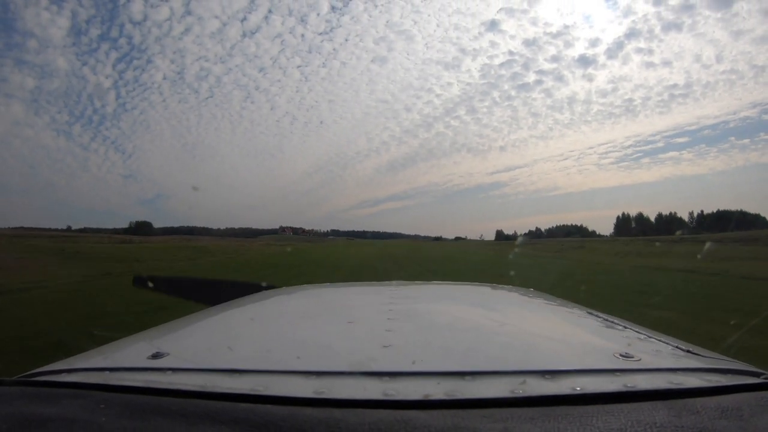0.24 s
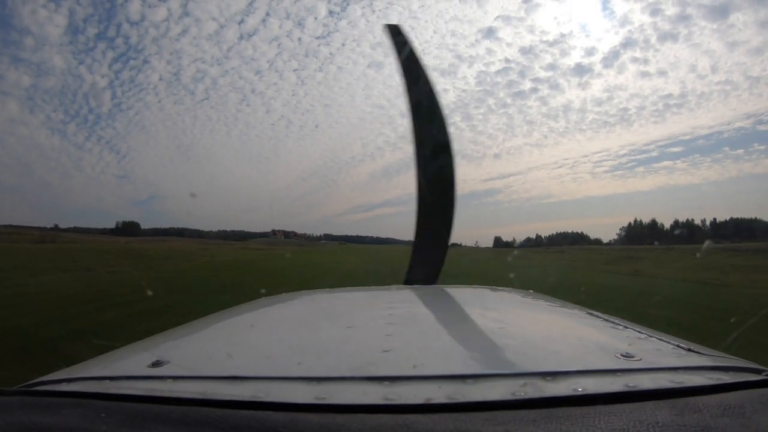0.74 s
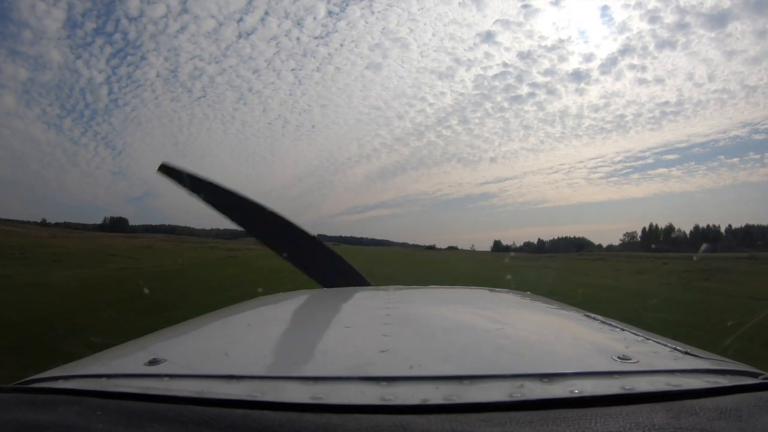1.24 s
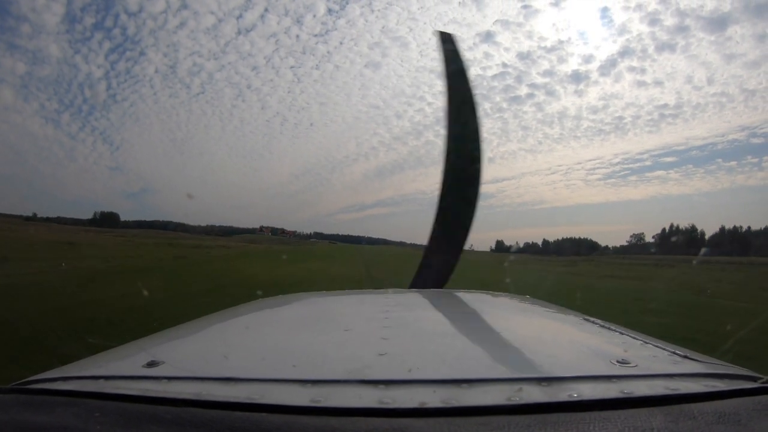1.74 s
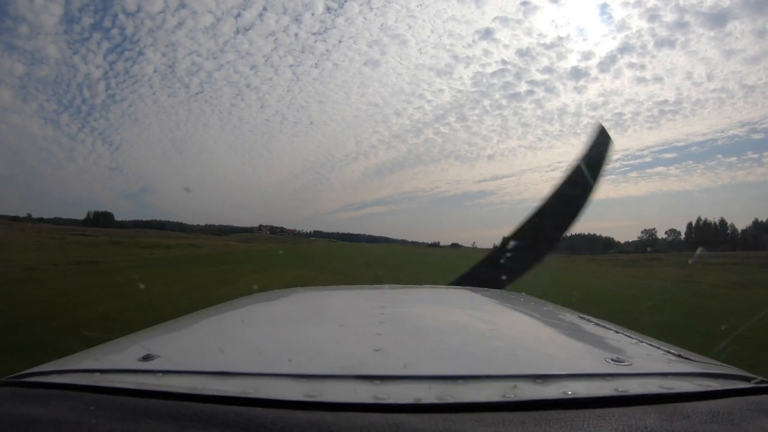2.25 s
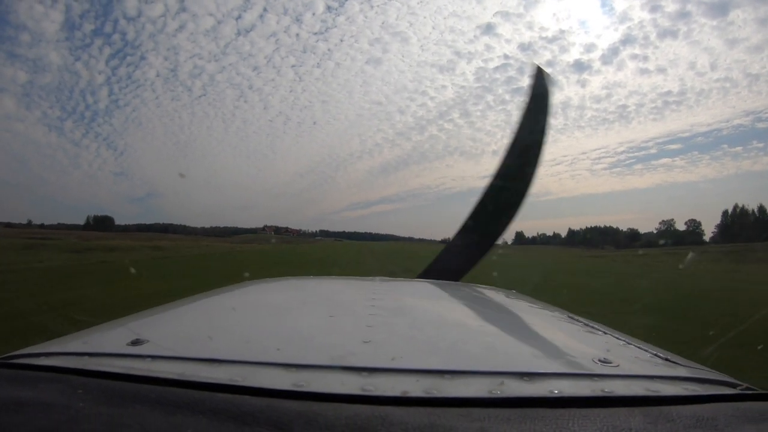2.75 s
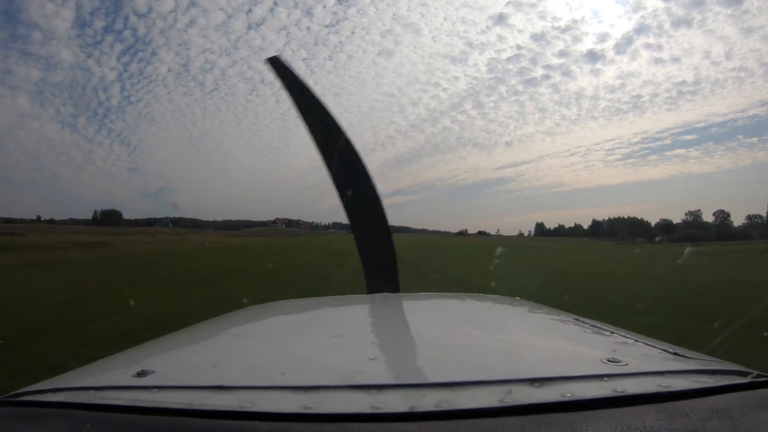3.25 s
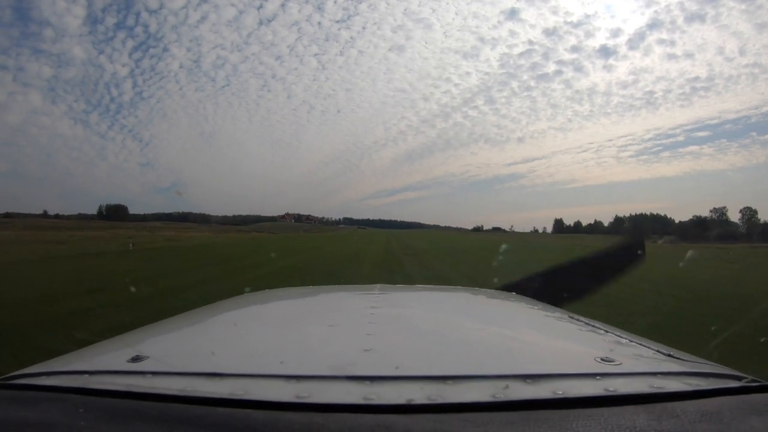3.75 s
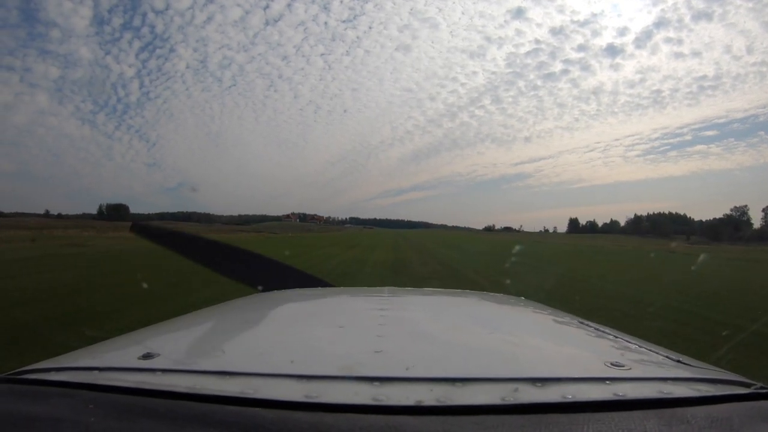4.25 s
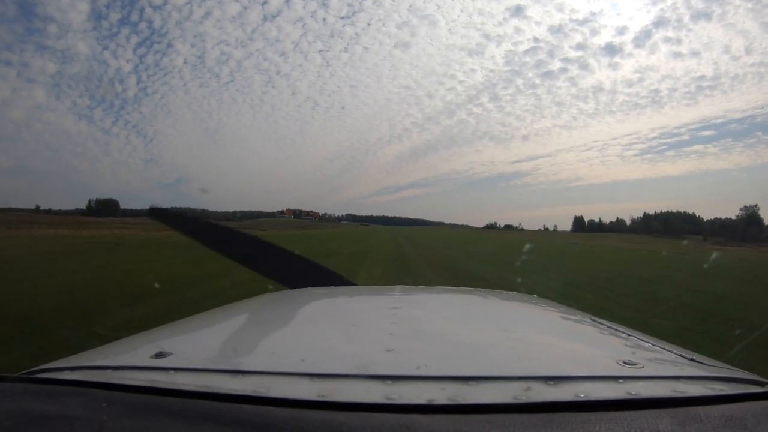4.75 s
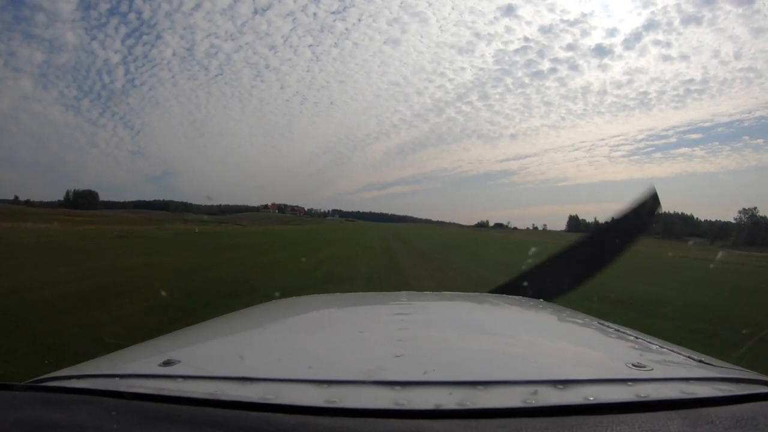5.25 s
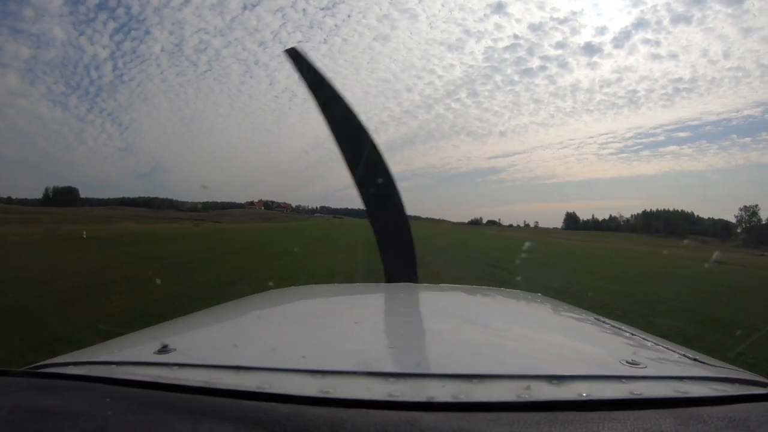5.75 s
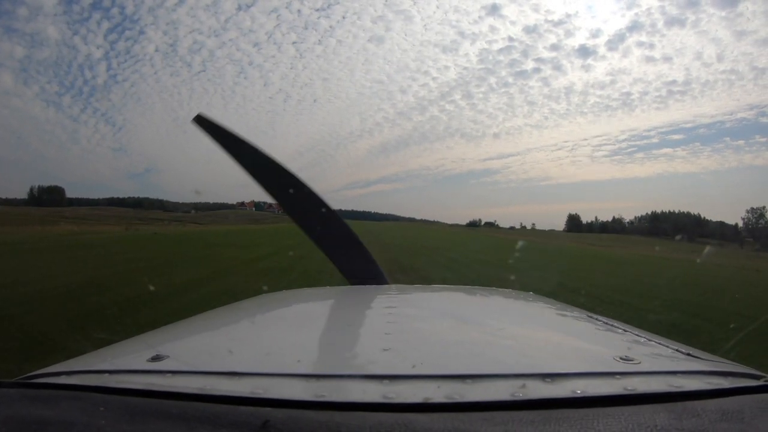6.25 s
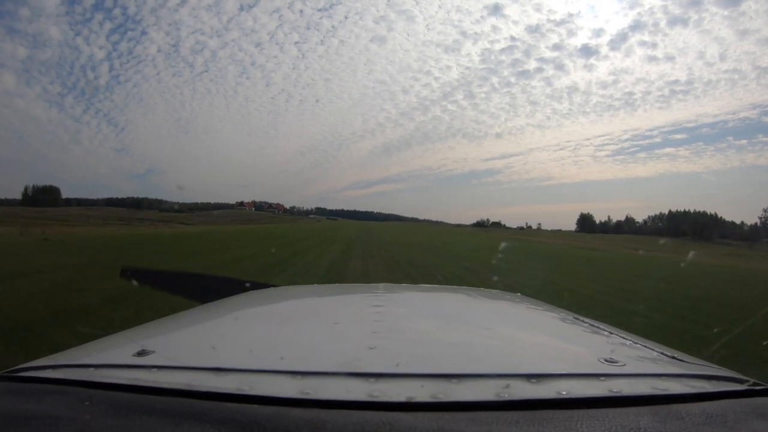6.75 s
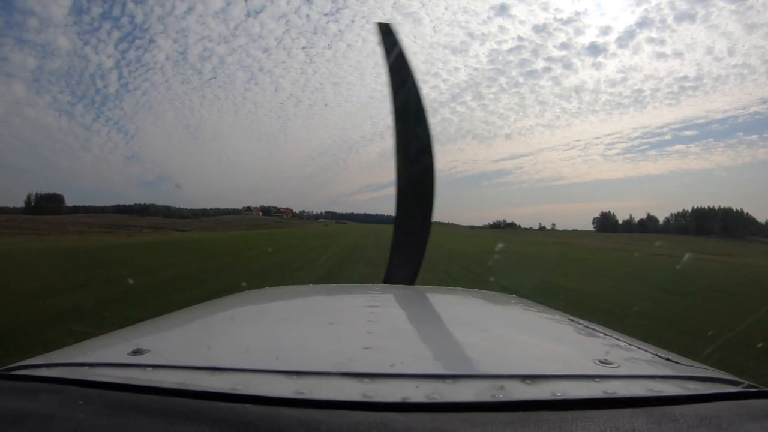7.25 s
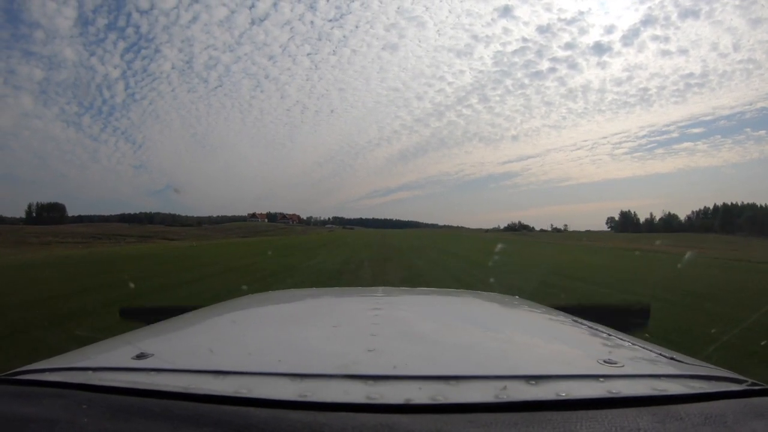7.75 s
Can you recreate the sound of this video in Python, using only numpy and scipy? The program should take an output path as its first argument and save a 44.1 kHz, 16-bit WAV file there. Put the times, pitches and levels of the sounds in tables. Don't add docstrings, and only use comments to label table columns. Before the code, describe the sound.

Inside a small aircraft cabin, a piston engine drones low at idle under rushing air with faint wavering whistles. After about three and a half seconds the wheels touch grass with thumps and a burst of grit, then a much louder, bumpy rumble continues to the end, with drumming panels, belly ticks and occasional metal chinks. Close, dry cabin microphone.

```python
import sys
import numpy as np
from scipy import signal
from scipy.fft import rfft, irfft, next_fast_len
from scipy.io import wavfile
from scipy.ndimage import uniform_filter1d

SR = 44100
rng = np.random.default_rng(int(sys.argv[2]) if len(sys.argv) > 2 else 0)


def field_ratio(decibels):
    return 10 ** (np.asarray(decibels, dtype=float) / 20)


def transcribe(signal):
    frames = np.atleast_2d(signal).T
    limited = np.clip(frames, -1, 1)
    pcm = np.round(limited * 32767).astype(np.int16)
    wavfile.write(sys.argv[1], SR, pcm)


N = 352783

# start_s, firing_hz, second_order_db
ENGINE = [(0, 34.17, -38.5), (1.4, 33.16, -35.5), (2.4, 32.61, -33.5), (3.4, 31.9, -30), (4.4, 30.44, -28),
          (5.2, 29.65, -28), (5.7, 29.21, -23.5), (6.3, 29.39, -24.5), (6.8, 28.88, -29), (7.2, 28.5, -31),
          (7.6, 28.42, -24.5), (8, 28.64, -36)]
# start_s, load_db
WHEEL_LOAD = [(3.44, -37), (3.54, -8.5), (3.59, -0.5), (3.74, 0), (3.82, 5.5), (4.0, 0), (4.14, -5),
              (4.33, 2), (4.86, -0.5), (5.2, -1.5), (5.58, -1), (5.72, 1.5), (6.27, 0), (6.55, -1),
              (6.92, 4), (7.25, 2), (7.57, 1), (8, 0)]


def evened(x):
    return x / np.sqrt(np.mean(x ** 2) + 1e-20)


def curves(rows):
    start_s, *columns = np.transpose(rows)
    return [np.interp(np.arange(N) / SR, start_s, column) for column in columns]


def colour(x, spectrum):
    size = next_fast_len(N)
    table_hz, level_db = np.transpose(spectrum)
    hz = np.fft.rfftfreq(size, 1 / SR)
    gain = field_ratio(np.interp(np.log(hz + 1), np.log(table_hz + 1), level_db))
    return evened(irfft(rfft(x, size) * gain, size)[:N])


def resonate(x, hz, width_hz):
    turn = np.exp(2j * np.pi * np.cumsum(hz * np.ones(len(x))) / SR)
    decay = np.exp(-np.pi * abs(width_hz) / SR)
    slow = signal.lfilter([1 - decay], [1, -decay], x / turn + 1e-18)
    slow = signal.lfilter([1 - decay], [1, -decay], slow)
    return evened((turn * slow).real)


def drift(hz):
    width = int(SR / hz)
    smooth = uniform_filter1d(rng.standard_normal(N), width)
    return evened(uniform_filter1d(smooth, width))


def impulses(per_s, spread_db, bed):
    size = field_ratio(spread_db * np.minimum(rng.exponential(1, N), 4)) * rng.choice([-1, 1], N)
    hits = evened(size * (rng.random(N) < per_s / SR))
    return evened(hits + bed * rng.standard_normal(N))


def add(mix, s, sound):
    part = mix[round(s * SR):][:len(sound)]
    part += sound[:len(part)]


def firing():
    firing_hz = curves(ENGINE)[0] * (1 + 0.0049 * drift(5.1))
    return 2 * np.pi * np.cumsum(firing_hz) / SR


def engine(angle):
    # multiple_of_firing, level_db
    order_levels = [(1, -34), (3, -36), (4, -41.5), (5, -54), (6, -50)]
    slip_rad = 0.36
    total = np.zeros(N)
    for order, level_db in [(2, curves(ENGINE)[1]), *order_levels]:
        phase = order * angle + 2 * np.pi * rng.random() + slip_rad * drift(26.0)
        total += field_ratio(level_db + 2.5 * drift(11.0)) * np.cos(phase)
    return np.sqrt(2) * total


def slipstream(angle):
    # start_s, buffet_db, hiss_db
    airflow = [
        (0, -31.5, -47.5),
        (1, -32, -48),
        (2, -31.5, -48.5),
        (3, -34, -50),
        (3.5, -32.5, -49.5),
        (8, -25, -52.5),
    ]
    # frequency_hz, level_db
    buffet_spectrum = [(5.9, -46), (10, -7.5), (43, -3), (92, -3), (116, -7.5), (196, -10.5), (239, -16.5),
                       (290, -21.5), (393, -28), (755, -36), (860, -37.5), (1070, -39), (1800, -53.5),
                       (2340, -56), (3960, -120)]
    # frequency_hz, level_db
    hiss_spectrum = [(710, -12), (1200, -1.5), (1350, -6), (1400, -4.5), (1510, -2), (2090, -3),
                     (2220, -1.5), (3140, -1.5), (4480, 2), (5820, -4), (6600, -3.5), (8480, -7.5),
                     (11500, -7), (14600, -21)]
    buffet_db, hiss_db = curves(airflow)
    buffet = field_ratio(buffet_db + 1.0 * drift(4.2)) * colour(rng.standard_normal(N), buffet_spectrum)
    chop_db = 0.5 * np.cos(angle) + 0.061 * drift(12) + 0.61 * drift(110)
    hiss = field_ratio(hiss_db + chop_db) * colour(rng.standard_normal(N), hiss_spectrum)
    slowing_db = hiss_db - hiss_db[0]
    return buffet + hiss + singing(slowing_db) + reed()


def singing(slowing_db):
    # pitch_hz, width_hz, level_db, fading (dB per dB of slowing)
    sung_modes = [
        (288.4, 16, -48, 0.89),
        (854, 91, -59, 1.6),
        (962, 57, -63.5, .9),
        (9460, 44, -78, 4.4),
    ]
    total = np.zeros(N)
    for pitch_hz, width_hz, level_db, fading in sung_modes:
        total += field_ratio(level_db + fading * slowing_db) * resonate(rng.standard_normal(N), pitch_hz, width_hz)
    return total + field_ratio(-66 + 2.5 * slowing_db) * resonate(rng.standard_normal(N), 2195, 45)


def reed():
    # start_s, length_s, tone (0 low, 1 high), level_db
    puffs = [(0.304, 0.35, -.3, -65), (.75, 0.21, 0.93, -66), (0.967, 0.17, -0.073, -66),
             (1.363, 0.17, 1, -64), (1.58, 0.13, 1, -65.5), (1.76, .16, 0, -64), (2.03, 0.53, 1, -66),
             (2.556, 0.52, 0, -69), (3.041, .1, 1, -63.5), (5.2, 1.7, 0.35, -61.5), (6.946, 1.2, 0, -65)]
    low_hz, step_hz, flip_s, rest_db = 1209, 105, 0.06, -72
    t = np.arange(N) / SR
    start, length, tone, level_db = np.transpose(puffs)
    end = start + length
    edges = np.ravel([start + flip_s / 2, end - flip_s / 2], "F")
    pitch_hz = low_hz + step_hz * np.interp(t, edges, np.repeat(tone, 2))
    nearest_edge_s = np.minimum(t - start[:, None], end[:, None] - t)
    held = np.clip(nearest_edge_s / flip_s + 0.5, 0, 1)
    tone_db = rest_db + (held * (level_db[:, None] - rest_db)).max(0)
    phase = 2 * np.pi * np.cumsum(pitch_hz + 6 * drift(38.6)) / SR
    return field_ratio(tone_db + 1.9 * drift(25)) * np.sqrt(2) * np.sin(phase)


def ground():
    # start_s, drumming_db, grit_db, settling_s
    rough_patches = [(3.61, 6, 9, 0.21), (3.69, -4, 1.5, 0.073), (3.99, 1.5, 6, 0.046),
                     (4.33, 3.5, 5, 0.33), (4.56, 4, 0.5, 0.11), (4.65, 0.5, 2.5, .1), (4.82, 8.5, 6, 0.26),
                     (5.0, 1, 2, 0.18), (5.22, 5, 4.5, 0.083), (5.68, 7, 3.5, 0.56), (5.9, 1, 1.5, 0.086),
                     (6.06, -1, -0.5, 0.086), (6.25, -2, 5, 0.13), (6.58, 3.5, 5, 0.14),
                     (6.72, 4.5, -1.5, .08), (6.86, 8, 5.5, .2), (7.08, 2, 1.5, 0.045),
                     (7.31, -0.5, 1.5, .12), (7.7, -1, 6, 0.052), (7.921, 7.5, 5.5, 0.13)]
    # middle_s, length_s, drop_db
    light_hops = [(3.595, 0.035, -1.5), (3.779, 0.037, -5.5), (4.148, 0.05, -1), (4.25, 0.066, -4),
                  (5.584, 0.034, 0.5), (5.96, .04, -6), (6.052, .04, -3.5), (6.834, .04, -4.5),
                  (7.27, 0.065, -3), (7.492, 0.066, -3.5), (7.797, 0.24, -8)]
    rise_s = 0.049
    t = np.arange(N) / SR
    start, drum_db, grit_db, settle_s = np.transpose(rough_patches)[:, :, None]
    rise = np.clip((t - start) / rise_s + 1, 0, 1)
    ruts = rise * np.exp(-np.maximum(t - start, 0) / abs(settle_s))
    hops = sum(db * np.exp(-(2 * (t - middle) / length) ** 2) for middle, length, db in light_hops)
    return curves(WHEEL_LOAD)[0], (drum_db * ruts).sum(0), (grit_db * ruts).sum(0), hops


def ground_roll():
    load_db, drum_ruts_db, grit_ruts_db, hops_db = ground()
    jolt_db = drift(11.6)
    low = gear_and_frame(-21.5 + load_db + hops_db + 0.16 * jolt_db)
    drum = drumming(-48.5 + 0.56 * load_db + drum_ruts_db + 0.8 * hops_db + 1.5 * jolt_db)
    grit = grit_spray(-53 + 0.55 * load_db + grit_ruts_db + 0.65 * hops_db + 0.18 * jolt_db)
    spin_up = np.clip((np.arange(N) / SR - WHEEL_LOAD[0][0]) / 0.05, 0, 1)
    return spin_up * (low + drum + grit)


def gear_and_frame(level_db):
    # frequency_hz, level_db
    gear_spectrum = [(5.9, -38), (10, -10), (49, -5), (106, -3), (160, -5.5), (205, -6.5), (298, -15),
                     (356, -22), (396, -29), (473, -28.5), (517, -33), (700, -36), (910, -80), (1540, -120)]
    # pitch_hz, width_hz, level_db
    frame_modes = [(59, 30, -8), (92, 4.5, -3.5), (105, 53, 4), (145, 30, -2), (201, 67, -4.5),
                   (272.8, 24, -12), (337, 60, -15)]
    bumps = impulses(per_s=140, spread_db=2.5, bed=1.0)
    shaking = colour(bumps, gear_spectrum)
    boom = evened(signal.sosfilt(signal.butter(2, 60, fs=SR, output="sos"), shaking))
    frame = evened(sum(field_ratio(db) * resonate(bumps, hz, width) for hz, width, db in frame_modes))
    boom_db = 2.5 + 1.5 * drift(5.8)
    return field_ratio(level_db) * (field_ratio(1.0) * (shaking - 0.55 * boom) + field_ratio(-6.5) * frame + field_ratio(boom_db - 2) * boom)


def drumming(level_db):
    # frequency_hz, level_db
    drum_spectrum = [(210, -12), (350, -2.5), (393, -6), (471, -3.5), (515, -20.5), (751, -8.5),
                     (822, -7.5), (1280, -16.5), (1970, -28), (3000, -36), (3900, -54), (6600, -120)]
    # pitch_hz, width_hz, level_db
    panel_modes = [(700, 51, -36), (818, 57, 7), (900, 38, 5), (1068, 47, 1.5), (1375, 180, -2.5)]
    taps = impulses(per_s=400, spread_db=2.0, bed=0.95)
    panels = evened(sum(field_ratio(db) * resonate(taps, hz, width) for hz, width, db in panel_modes))
    return field_ratio(level_db) * (field_ratio(3.5) * colour(taps, drum_spectrum) + field_ratio(-9.0) * panels)


def grit_spray(level_db):
    # frequency_hz, level_db
    grain_spectrum = [(880, -1), (1500, -2), (2050, -3.5), (3740, 1.5), (4790, -5), (5320, -3.5),
                      (6020, -5), (7290, -5), (12000, -9.5), (13100, -8.5), (14600, -27)]
    spray = colour(impulses(per_s=2000, spread_db=8.5, bed=2.7), grain_spectrum)
    coarse = signal.sosfilt(signal.butter(2, 6000, fs=SR, output="sos"), spray)
    fine = signal.sosfilt(signal.butter(2, 6000, "high", fs=SR, output="sos"), spray)
    gust_db = 0.54 * drift(35) + 1.53 * drift(110)
    gusting = field_ratio(1.5 * drift(25)) * coarse - field_ratio(0.43 * drift(45)) * fine
    return field_ratio(level_db + 1.0 + gust_db) * gusting


def thumps():
    # start_s, peak_db, ring_hz
    floor_blows = [(3.469, -11, 96), (3.64, -8, 60), (3.559, -26, 109), (3.726, -4, 70), (3.799, 5, 98.4),
                   (3.812, -4, 150), (4.308, -12, 80.7), (4.44, -6, 71), (4.86, 0, 89), (5.23, -1, 65),
                   (6.001, -0.5, 105), (6.599, 5, 51.5), (6.91, 6.5, 60), (7.039, 5, 51.1),
                   (7.57, -18, 56.3), (7.918, 6.5, 110.1)]
    out, t = np.zeros(N), np.arange(8000) / SR
    envelope = np.minimum(t / 0.0172, 1) * field_ratio(-60 * t / 0.16)
    for start_s, peak_db, ring_hz in floor_blows:
        add(out, start_s, field_ratio(peak_db - 7.0) * np.sin(2 * np.pi * ring_hz * t) * envelope)
    return out


def strikes():
    # start_s, peak_db, top_share_db
    belly_hits = [(3.5932, -31, -7), (3.607, -22, -18), (3.6103, -20, -12), (3.624, -18, -11),
                  (3.6661, -28, -19), (3.6834, -29, -11), (3.7, -23.5, -9), (3.7447, -27, -16),
                  (3.9105, -27.5, -13), (4.2797, -30, -9), (4.334, -30, -25), (4.3484, -31, -8),
                  (4.4687, -29.5, -9), (4.656, -28.5, -7), (4.7845, -30, -16), (4.9015, -27, -9),
                  (4.987, -27, -15), (5.227, -32.5, -7), (5.671, -28, -15), (5.9678, -29, -8),
                  (6.181, -28.5, -16), (6.2517, -22.5, -19), (6.272, -32, -14), (6.3051, -25.5, -15),
                  (6.4757, -33, -21), (6.6817, -34, -19), (6.914, -30, -30), (6.9671, -33, -20),
                  (7.012, -27, -17), (7.105, -36, -17)]
    out, t = np.zeros(N), np.arange(1500) / SR
    top = signal.butter(2, [9000, 13000], "band", fs=SR, output="sos")
    wide = signal.butter(3, [3400, 8000], "band", fs=SR, output="sos")
    envelope = np.minimum(t / 0.00055, 1) * field_ratio(-60 * t / 0.03)
    for start_s, peak_db, top_db in belly_hits:
        puff = rng.standard_normal(1500)
        ring_hz = 3750 + 49 * (peak_db + 34)
        body = 0.14 * resonate(puff, ring_hz, 1700) + 0.42 * evened(signal.sosfilt(wide, puff))
        burst = body + field_ratio(top_db) * evened(signal.sosfilt(top, puff))
        add(out, start_s, field_ratio(peak_db - 2.5) * burst * envelope)
    return out


def panel_knocks():
    # start_s, peak_db, ring_hz
    panel_blows = [(3.599, -38, 824), (3.7, -26, 820), (4.075, -22, 850), (4.176, -25, 970),
                   (4.421, -39, 824), (4.481, -25, 830), (4.602, -28, 700), (4.807, -27, 834),
                   (4.932, -23, 796), (5.029, -36, 826), (5.397, -24, 833), (5.448, -30, 719),
                   (5.636, -25, 896), (5.905, -21, 900), (6.066, -28, 797), (6.119, -21.5, 896),
                   (6.262, -28, 1040), (6.33, -21, 866), (6.564, -38, 815), (6.617, -23, 686),
                   (6.715, -24.5, 818), (6.832, -29, 900), (6.878, -19.5, 960), (7.032, -30, 921),
                   (7.13, -35, 900), (7.3, -36, 850), (7.557, -27, 807), (7.599, -30.5, 1030)]
    out, t = np.zeros(N), np.arange(8000) / SR
    envelope = np.minimum(t / 0.008, 1) * field_ratio(-60 * t / 0.12)
    for start_s, peak_db, ring_hz in panel_blows:
        puff = rng.standard_normal(8000)
        add(out, start_s, field_ratio(peak_db - 9.5) * resonate(puff, ring_hz, 260) * envelope)
    return out


def chinks():
    # start_s, peak_db, pitch_hz
    fitting_hits = [
        (5.3293, -26, 5230),
        (5.672, -42, 5140),
        (6.2517, -30, 3630),
        (6.3051, -27, 3540),
        (6.5996, -24, 5170),
        (6.6636, -22.5, 5220),
        (7.437, -31, 5200),
    ]
    out, t = np.zeros(N), np.arange(1500) / SR
    envelope = np.minimum(t / 0.00093, 1) * field_ratio(-60 * t / 0.022)
    for start_s, peak_db, pitch_hz in fitting_hits:
        add(out, start_s, field_ratio(peak_db - 4.0) * np.sin(2 * np.pi * pitch_hz * t) * envelope)
    return out


def scene():
    angle = firing()
    flight = engine(angle) + slipstream(angle)
    landing = ground_roll() + thumps() + strikes() + panel_knocks() + chinks()
    return (flight + landing)[None]


def top_cut(x):
    return signal.sosfilt(signal.butter(12, 15700, fs=SR, output="sos"), x)


def record(dry):
    heard = signal.sosfilt(signal.butter(1, 12, "high", fs=SR, output="sos"), dry)
    heard = signal.sosfilt(signal.butter(8, 15600, fs=SR, output="sos"), heard)
    heard = 1.1 * np.tanh(heard / 1.1)
    return top_cut(heard)


dry = scene()
out = record(dry)
transcribe(out)
```